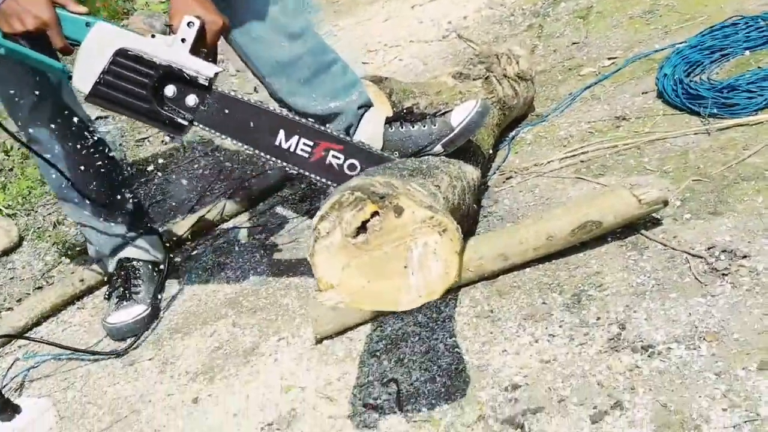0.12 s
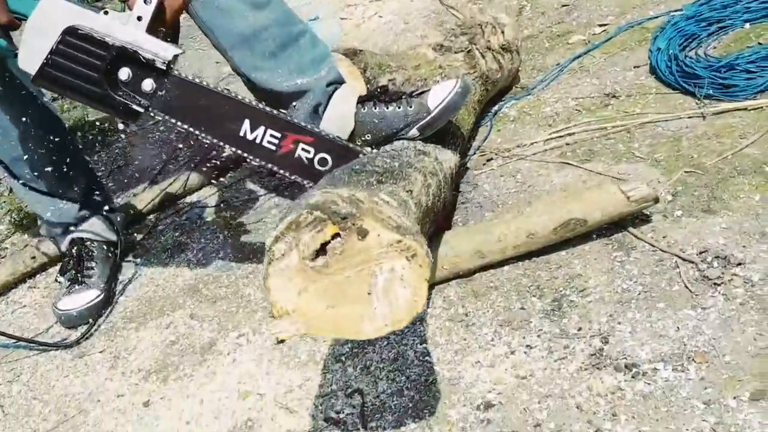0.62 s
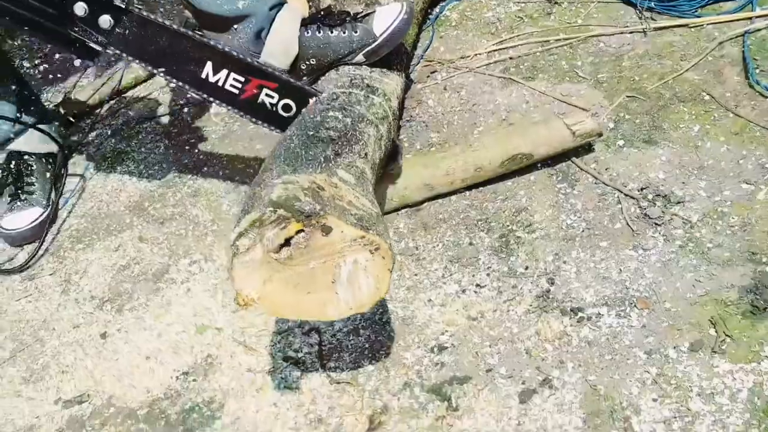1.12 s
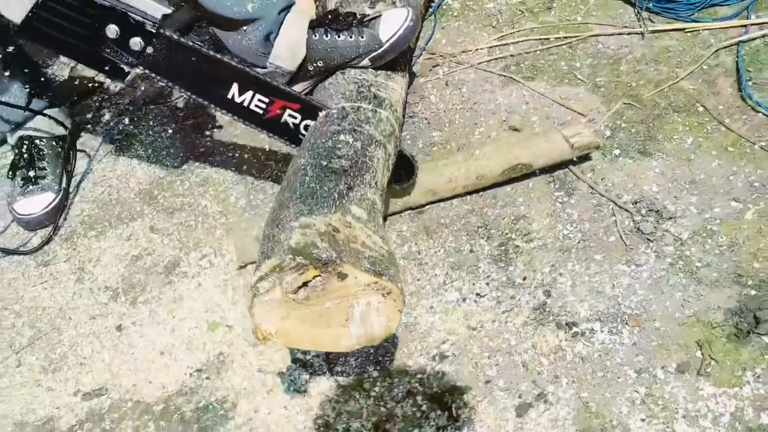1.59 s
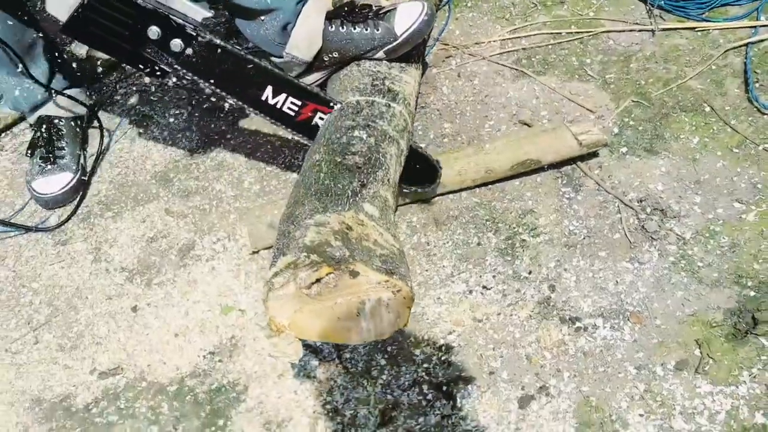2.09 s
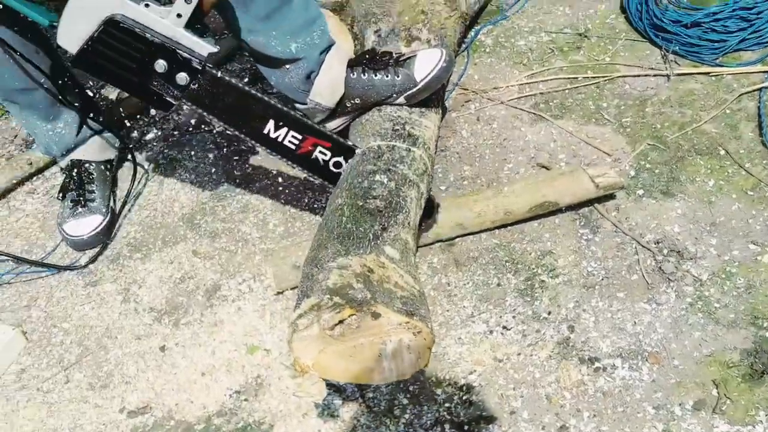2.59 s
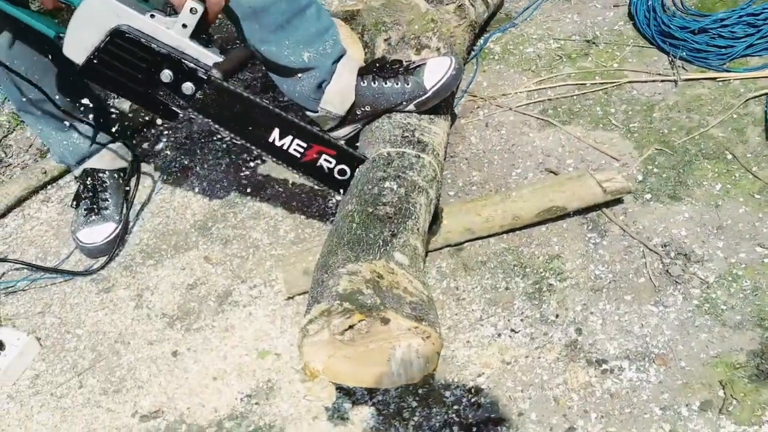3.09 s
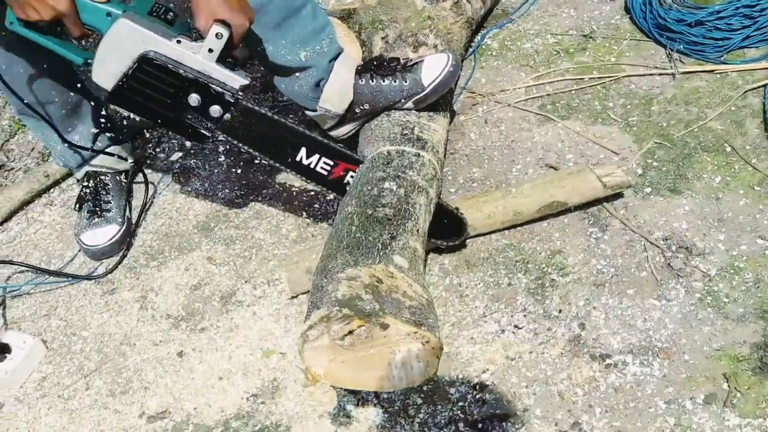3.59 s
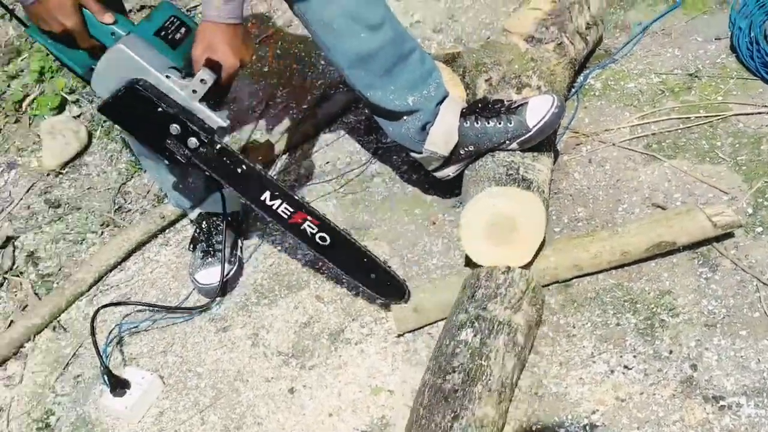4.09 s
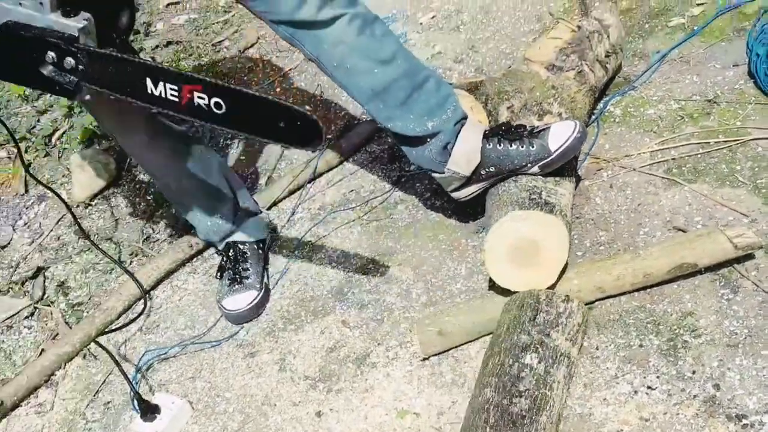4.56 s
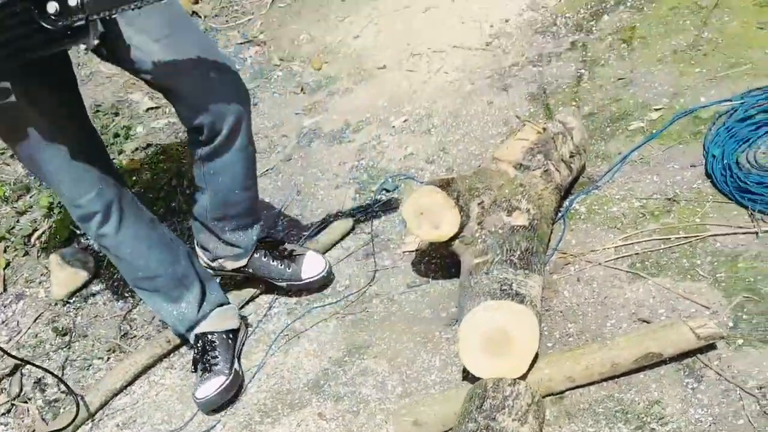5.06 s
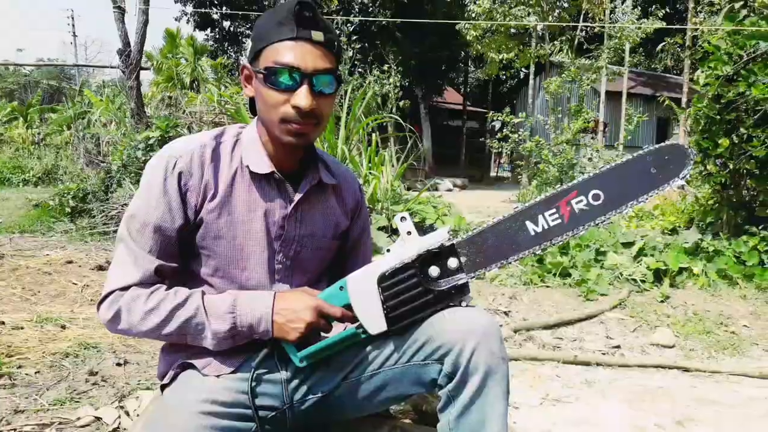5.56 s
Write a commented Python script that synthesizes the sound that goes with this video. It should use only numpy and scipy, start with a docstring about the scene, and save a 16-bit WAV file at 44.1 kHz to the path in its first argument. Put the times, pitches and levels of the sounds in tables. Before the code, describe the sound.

A close, mono outdoor take of an electric chainsaw biting through wood, loud and buzzing with slight surges and low wind on the microphone. Near four seconds it breaks through with tiny snaps and dull thumps, revs freely, then switches off and runs down, the loose chain rattling. A hard cut leads to barely audible leaves and distant soft falling tones.

```python
"""Bare ground by a garden: a corded electric chainsaw cuts through a log, runs free and coasts down.
After a short silence a quiet garden follows, with rustling leaves and faint falling tones.
Many tiny chain contacts (shaped noise) ring in bar, housing and wood; noise also makes hiss and wind.
Sine tones follow the rotor: the motor pinion whines at nine times its speed.
The chain contacts and the main gear tone throb with the sprocket."""
import sys
import numpy as np
from scipy import signal
from scipy.fft import rfft, irfft
from scipy.io import wavfile

SR = 44100
rng = np.random.default_rng(int(sys.argv[2]) if len(sys.argv) > 2 else 0)


def field_ratio(decibels):
    """Amplitude ratio for a level in dB (20 dB per decade); scalars and array-likes work."""
    return 10 ** (np.asarray(decibels, dtype=float) / 20)


def materialize(psi):
    """Save the field psi as 16-bit PCM at rate SR to the path in sys.argv[1].

    A 1-D psi becomes a single channel; in a 2-D psi each row is a channel.
    """
    bounded = np.clip(np.atleast_2d(psi).T, -1, 1)
    quanta = np.round(bounded * 32767).astype(np.int16)
    wavfile.write(sys.argv[1], SR, quanta)


N = 250488

CUT_THROUGH_S, SWITCH_OFF_S = 3.86, 4.4
SILENCE_START_S, SILENCE_END_S = 5.3905, 5.4225

# Rotor speed, unsteady under load, faster out of the wood, then coasting: t/s, speed/(turns/s)
ROTOR_SPEED = [(0.0, 366.5), (0.3, 361.6), (0.64, 368), (0.76, 363), (1.0, 368), (1.22, 366), (1.45, 369),
               (1.62, 368.6), (1.8, 373.8), (2.04, 369), (2.3, 372), (2.42, 370), (2.66, 373.6),
               (2.86, 369), (3.0, 371), (3.15, 368.4), (3.5, 372), (3.84, 377), (4.18, 400), (4.35, 385),
               (4.65, 312), (4.9, 279), (5.12, 253), (5.25, 236), (5.39, 223)]
PINION_TEETH, COMMUTATOR_BARS, GROAN_ORDER = 9, 32, 3  # each tone's multiple of the rotor speed

# Tones swell and fade as the saw rocks, one table per tone: middle t/s, length/s, level/dB
MESH_SWELLS = [(0.0, 0.086, -21), (0.342, .15, -22), (0.62, 0.5, -24.5), (1.247, 0.43, -23),
               (1.595, 0.13, -23), (1.79, 0.13, -21.5), (2.206, 0.46, -18.5), (2.494, 0.5, -17.5),
               (2.86, 0.13, -17.5), (3.05, 0.1, -18.5), (3.653, 0.26, -19.5)]
SECOND_SWELLS = [(0.04, .12, -21), (0.26, .18, -21), (0.55, .2, -24), (0.77, .14, -19), (1.12, .2, -22),
                 (1.62, .14, -19), (1.77, .12, -22), (2.05, .22, -20), (2.87, .14, -20), (3.48, .1, -26)]
UPPER_SWELLS = [(0.45, 0.18, -22), (1.35, 0.53, -24), (1.74, 0.12, -16.5), (2.15, 0.28, -27),
                (2.9, .15, -21), (3.22, 0.18, -15.5), (3.45, 0.18, -21), (3.72, 0.4, -26.5)]
LOWER_SWELLS = [(0.31, 0.13, -24), (3.54, 0.13, -22)]
HUM_SWELLS = [(0.12, 0.44, -39.5), (0.46, 0.08, -37.5), (0.65, 0.36, -42.5), (1.12, 0.23, -39),
              (1.55, 0.17, -43), (1.95, .2, -43)]
# The same for commutator whine and groan out of the wood: middle t/s, length/s, level/dB
WHINE_SWELLS = [(4.66, .12, -50), (5.17, .13, -39), (5.3, .12, -42), (5.38, .08, -35)]
GROAN_SWELLS = [(4.45, 0.46, -37), (4.75, 0.71, -36.5)]
# steady levels under the swells
MESH_DB, SECOND_DB, UPPER_DB, LOWER_DB, HUM_DB = -30.5, -35, -32, -34.5, -48.5
WHINE_DB, GROAN_DB = -55, -50.5
COAST_HUM_DB, HUM_FADE_DB_PER_S = -51.5, 6

# Force of the chain: t/s, level/dB
CHAIN_FORCE = [(0.0, -14), (0.04, -11), (2.56, -12.5), (2.62, -12.5), (3.74, -12), (3.91, -13.5),
               (4.69, -16.5), (4.75, -18.5), (5.38, -19.5)]
# Middle of each posture, as the bar sinks in and lifts out: t/s
POSTURE_TIMES = [.5, 1.5, 2.4, 3.3, 4.1, 4.42, 4.72, 5.15]
# What rings, one list per posture: f/Hz, width/Hz (held within 120 to 1200 when used), level/dB
POSTURE_RINGS = [
    [(381, 380, -19.5), (740, 340, -9), (1070, 230, 5), (1567, 110, -9), (1700, 300, 3), (2306, 1700, -3.5),
     (2980, 900, -4.5), (3215, 200, -4), (3510, 550, -0.5), (4320, 770, -3.5), (5230, 870, -4),
     (6016, 390, 1), (6320, 510, 0.5), (6910, 630, -3.5)],
    [(550, 200, -13.5), (768, 440, -12), (990, 380, -3.5), (1518, 130, 2), (1785, 330, 0),
     (2430, 530, -3.5), (3020, 1100, -7.5), (3240, 130, -1), (3564, 200, 0), (4420, 640, -7),
     (5250, 590, -10), (5740, 1400, -6), (6430, 340, -7), (6830, 320, -2)],
    [(507, 160, -23), (740, 300, -17), (977, 330, -12.5), (1594, 290, -5), (1694, 50, -17.5),
     (2420, 250, -11), (2895, 480, -13.5), (3325, 370, -6.5), (3755, 580, -8.5), (4540, 1630, -14.5),
     (5320, 220, -14), (5860, 200, -12.5), (6270, 900, -17), (6500, 790, -10.5)],
    [(548, 270, -17), (800, 340, -14.5), (917, 520, -8), (1488, 83, -2), (1684, 165, -2), (2600, 960, -7.5),
     (2900, 240, -10.5), (3440, 280, -23.5), (3490, 730, -1.5), (4760, 250, -4), (5580, 160, -3.5),
     (6450, 600, -4.5), (7190, 240, -11)],
    [(497, 172, -14), (724, 590, -8), (1050, 970, -4.5), (1512, 200, 2), (1640, 270, -2), (2380, 290, -1.5),
     (2695, 240, -1.5), (3750, 980, 2), (4760, 320, -4.5), (5460, 1400, -5.5), (6300, 1500, -12.5),
     (7200, 220, -7)],
    [(476, 160, -5), (740, 190, -10), (1080, 390, -1.5), (1670, 510, 0), (2730, 560, -0.5),
     (3760, 470, -0.5), (4770, 450, -2), (5660, 510, -4.5), (6500, 760, -3.5), (6750, 340, -9)],
    [(430, 180, -6.5), (870, 260, -4), (1250, 210, 2.5), (1590, 410, -1.5), (2630, 920, 1.5),
     (4020, 460, -1.5), (4720, 640, -3), (5780, 660, -4.5), (6500, 730, -8), (7000, 790, -11)],
    [(449, 130, 2.5), (810, 210, -13), (1117, 320, 2.5), (1654, 470, 0), (2730, 1600, -4),
     (3580, 300, -4.5), (4030, 430, 0), (4900, 630, -3.5), (5700, 810, -6.5), (6570, 270, -7),
     (6800, 340, -6)],
]
# Colour of the broad rasp between the resonances: f/Hz, level per Hz/dB
RASP_COLOUR = [(150, -24.5), (350, -6.5), (900, -9), (1250, -1.5), (1700, 3), (3300, -2.5), (5000, -8.5),
               (6800, -8), (7600, -3.5), (8400, -59), (10000, -51)]
# Colour of the fan and chip hiss: f/Hz, level per Hz/dB
HISS_COLOUR = [(6000, -25), (7600, -4.5), (8500, -10), (9500, -4.5), (10500, 0.5), (11800, 4.5), (13200, 1),
               (14300, 2), (15720, 0.5), (15800, -59)]
# hiss against the chain force, in the wood and out of it; flying chips stop within CHIPS_END_S
HISS_CUT_DB, HISS_FREE_DB, CHIPS_END_S = -12.5, -15.5, 0.049
# share by which each sprocket turn swells the ringing contacts, and its slow wavering
THROB, THROB_WAVER = 0.097, 0.079
# Bands where the ground echo cancels: f/Hz, width/Hz, share removed
GROUND_DIPS = [(570, 80, 0.36), (1225, 253, 0.69), (2178, 110, 0.42)]

# Wind on the microphone, before its flutter: t/s, level/dB
WIND_GUSTS = [(0.0, -48), (0.45, -56), (0.81, -47.5), (1.72, -54.5), (2.58, -44), (2.83, -57), (3.99, -50),
              (4.27, -58), (5.21, -51), (5.38, -64.5)]
# Colour of the wind: f/Hz, level per Hz/dB
WIND_COLOUR = [(20, -53), (35, -22), (55, -9.5), (90, -1.5), (200, -0.5), (320, -4), (500, -49)]
# Sudden low puffs: middle t/s, level/dB
WIND_PUFFS = [(0.148, -46), (0.75, -42), (0.925, -43), (1.53, -37), (2.38, -45), (2.59, -47), (3.255, -43),
              (4.405, -45), (4.71, -43), (4.96, -45.5), (5.24, -42.5), (5.33, -39)]
# Colour of the puffs: f/Hz, level per Hz/dB
PUFF_COLOUR = [(25, -29.5), (50, -8), (90, -1), (150, -3.5), (250, -14), (400, -39)]
PUFF_S = 0.036

# The cut end tears off and lands: start t/s, length/s, start f/Hz, end f/Hz, peak level/dB
OFFCUT_TONES = [(3.725, .045, 350, 320, -35), (3.78, .04, 290, 260, -37), (3.808, .045, 205, 175, -35),
                (3.937, .028, 150, 100, -36), (3.977, .03, 165, 110, -32), (4.13, .04, 160, 110, -41)]
# The last fibres snap, high and brief: t/s, level/dB
FIBRE_SNAPS = [(3.796, -16.5), (3.8266, -12.5)]
SNAP_HZ, SNAP_WIDTH_HZ, SNAP_S = 10570, 1600, 0.003
# Loud slaps of the slack chain on the bar: t/s, peak level/dB
LOUD_SLAPS = [(4.4586, -12), (4.4834, -15), (4.5084, -13), (4.595, -9.5), (4.6498, -8.5), (4.706, -8.5),
              (4.8733, -15), (4.9232, -25), (5.0018, -13), (5.053, -12), (5.0804, -9.5), (5.1098, -14.5),
              (5.1492, -11), (5.1703, -8), (5.2071, -15), (5.2125, -9), (5.2348, -13), (5.2475, -13.5),
              (5.2754, -14), (5.3093, -12), (5.3356, -12.5), (5.3472, -12)]
SMALL_SLAPS_PER_S, SMALL_SLAP_DB, SLAP_S = 20, -18, 0.0016

# Louder rustles of the leaves: middle t/s, length/s, level/dB
LEAF_RUSTLES = [(5.427, .02, -53), (5.487, 0.022, -52), (5.529, .07, -51)]
# Colour of the garden: f/Hz, level per Hz/dB
GARDEN_COLOUR = [(35, -38), (60, -8), (91, -5), (192, -8.5), (433, -22), (599, -24), (810, -28),
                 (931, -12.5), (1380, -20.5), (2310, -15), (3120, -28), (8670, -54), (15500, -29)]
# Short falling tones far off: start t/s, length/s, start f/Hz, end f/Hz, peak level/dB
FAR_FALLS = [(5.445, .06, 930, 860, -60), (5.44, .07, 465, 425, -58), (5.525, .055, 960, 900, -57),
             (5.618, .055, 1300, 960, -54), (5.512, .09, 210, 85, -43)]
GARDEN_DB, GARDEN_FADE_DB_PER_S = -52, 9


def rms_one(x):
    """Scales a signal to an average strength (rms) of 1."""
    return x / np.sqrt(np.mean(x ** 2) + 1e-20)


def in_time(rows):
    """Draws straight lines between the rows of a table, one curve per column."""
    s, *columns = np.transpose(rows)
    return [np.interp(np.arange(N) / SR, s, column) for column in columns]


def colour(x, points):
    """Multiplies the spectrum by a curve drawn over log frequency; rms 1."""
    hz, db = np.transpose(points)
    bins = np.maximum(np.arange(N // 2 + 1) * SR / N, 1)
    curve_db = np.interp(np.log(bins), np.log(hz), db)
    return rms_one(irfft(rfft(x) * field_ratio(curve_db), N))


def drift(rate_hz):
    """Slow random wandering: noise through two equal one-pole low-passes; spread 1."""
    r = np.exp(-80 * np.pi * rate_hz / SR)  # made at one value per 40 samples
    noise = rng.standard_normal(N // 40 + 2002)
    slow = signal.lfilter([1], [1, -2 * r, r * r], noise)[2000:]
    return np.interp(np.arange(N) / 40, np.arange(len(slow)), rms_one(slow))


def swelling(steady_db, swells):
    """Gain: a steady level plus bell-shaped swells, added in power."""
    t = np.arange(N) / SR
    power = field_ratio(steady_db) ** 2
    for s, length, db in swells:
        power = power + field_ratio(db) ** 2 * np.exp(-(4 * (t - s) / length) ** 2 / 2)
    return np.sqrt(power)


def resonate(x, hz, width_hz):
    """A resonance applied twice: steep flanks, dark valleys."""
    r = np.exp(-np.pi * width_hz / SR)
    b = [(1 - r * r) / 2, 0, (r * r - 1) / 2]
    a = [1, -2 * r * np.cos(2 * np.pi * hz / SR), r * r]
    return signal.lfilter(b, a, signal.lfilter(b, a, x))


def bright():
    """Noise with its bass weakened by a gentle high-pass."""
    high_pass = signal.butter(1, 2500, "high", fs=SR, output="sos")
    return signal.sosfilt(high_pass, rng.standard_normal(N))


def rotor():
    """Adds up speed into the angles of the motor shaft and of the sprocket behind the 9:53 gear."""
    angle = 2 * np.pi * np.cumsum(in_time(ROTOR_SPEED)[0]) / SR
    loaded = np.arange(N) / SR < CUT_THROUGH_S
    return angle, angle * PINION_TEETH / 53, loaded


def motor(angle, sprocket, loaded):
    """Gear teeth meet in a tone with side tones; the worn gear swells some once per sprocket turn."""
    wobble = 0.1 * drift(25)
    mesh = swelling(MESH_DB, MESH_SWELLS) * field_ratio(1.2 * drift(5.1))
    mesh *= (1 + 0.31 * np.cos(sprocket)) * np.sin(PINION_TEETH * angle + wobble)

    # twice the mesh frequency, with a neighbour one sprocket turn below and above
    phase = 2 * PINION_TEETH * angle + 0.47 * drift(18)
    second = 0.79 * np.sin(phase) + 0.63 * np.sin(phase - sprocket) + 0.34 * np.sin(phase + sprocket)
    second *= swelling(SECOND_DB, SECOND_SWELLS) * field_ratio(3.8 * drift(21))

    # side tones one rotor turn above and below the mesh
    upper = swelling(UPPER_DB, UPPER_SWELLS) * field_ratio(2.6 * drift(24))
    upper *= (0.8 + 0.2 * np.cos(sprocket)) * np.sin((PINION_TEETH + 1) * angle + 0.66 * drift(29.5))
    lower = swelling(LOWER_DB, LOWER_SWELLS) * np.sin((PINION_TEETH - 1) * angle + wobble)

    hum = swelling(HUM_DB, HUM_SWELLS) * field_ratio(2.6 * drift(12))
    hum *= np.sin(angle + 0.58 * drift(7.9))

    whine = swelling(WHINE_DB, WHINE_SWELLS) * field_ratio(drift(20)) * np.sin(COMMUTATOR_BARS * angle)
    fade_db = HUM_FADE_DB_PER_S * np.maximum(np.arange(N) / SR - CUT_THROUGH_S, 0)
    coast_hum = field_ratio(COAST_HUM_DB - fade_db) * np.sin(angle)
    groan = swelling(GROAN_DB, GROAN_SWELLS) * field_ratio(3.0 * drift(15))
    groan *= np.sin(GROAN_ORDER * angle + 0.98 * drift(23))

    in_wood = mesh + second + upper + lower + hum
    free = whine + coast_hum + groan
    return np.sqrt(2) * np.where(loaded, in_wood, free)  # sqrt(2) turns peak into rms levels


def contacts(sprocket, throb, grain_db, tooth):
    """Dense uneven contacts, bunched per turn and per tooth of the six-tooth sprocket."""
    uneven_db = grain_db * np.minimum(rng.exponential(1, N), 5)
    grains = field_ratio(uneven_db) * rng.standard_normal(N)
    turn_beat = 1 + np.clip(throb, 0, 1) * np.cos(sprocket)
    tooth_beat = 1 + tooth * np.cos(6 * sprocket)
    return rms_one(grains * turn_beat * tooth_beat)


def chain(sprocket):
    """Contacts ring in the resonances of each posture; postures blend into each other."""
    t = np.arange(N) / SR
    force_db = in_time(CHAIN_FORCE)[0]
    throb = THROB + THROB_WAVER * drift(3.3)
    slap = slaps(force_db)

    # two unrelated noise drives alternate between neighbouring resonances,
    # so they do not cancel between them; neighbouring postures use different pairs
    drives = [[slap * bright() + contacts(sprocket, throb, grain_db=1.5, tooth=0.059)
               for _ in range(2)] for _ in range(2)]
    ringing = np.zeros(N)
    for k, rings in enumerate(POSTURE_RINGS):
        share = np.interp(t, POSTURE_TIMES, np.arange(len(POSTURE_RINGS)) == k)
        near = slice(np.argmax(share > 0), N - np.argmax(share[::-1] > 0))  # where it is heard
        body = 0
        for j, (hz, width_hz, db) in enumerate(rings):
            gain = field_ratio(db + 1.25 * drift(7.1)[near])
            body = body + gain * resonate(drives[k % 2][j % 2][near], hz, np.clip(width_hz, 120, 1200))
        ringing[near] += np.sqrt(share[near]) * rms_one(body)

    rasp_contacts = contacts(sprocket, 0.12 * throb, grain_db=-2.5, tooth=0.05)
    rasp = colour(slap * bright() + rasp_contacts, RASP_COLOUR)
    hiss = colour(contacts(sprocket, 1.1 * throb, grain_db=3.0, tooth=0.11), HISS_COLOUR)
    chips_end = [CUT_THROUGH_S - CHIPS_END_S, CUT_THROUGH_S]
    hiss_db = force_db + np.interp(t, chips_end, [HISS_CUT_DB, HISS_FREE_DB]) + 0.5 * drift(11.0)
    surge = field_ratio(0.71 * drift(34))  # the teeth bite unevenly
    return surge * (field_ratio(force_db) * (ringing + field_ratio(-13.0) * rasp) + field_ratio(hiss_db) * hiss)


def ground(x):
    """The echo off the ground takes out a few narrow bands."""
    for hz, width_hz, share in GROUND_DIPS:
        b, a = signal.iirpeak(hz, hz / width_hz, fs=SR)
        x = x - share * signal.lfilter(b, a, x)
    return x


def wind():
    """Lumpy low noise with sudden puffs of their own low colour."""
    lumps = field_ratio(in_time(WIND_GUSTS)[0] + 1.8 * drift(8))
    steady = lumps * colour(rng.standard_normal(N), WIND_COLOUR)
    puff_gain = swelling(-89.5, [(s, PUFF_S, db) for s, db in WIND_PUFFS])
    return steady + puff_gain * colour(rng.standard_normal(N), PUFF_COLOUR)


def falling(tones):
    """Soft, slightly ragged tones that fall quickly in pitch and then level out."""
    out = np.zeros(N)
    for s, length, start_hz, end_hz, db in tones:
        u = np.arange(round(length * SR)) / (length * SR)  # 0 to 1 along the tone
        hz = end_hz + (start_hz - end_hz) * np.exp(-3.5 * u)
        swell = field_ratio(db) * np.sin(np.pi * u ** 0.8)
        tone = swell * np.sin(2 * np.pi * np.cumsum(hz) / SR)
        i = round(s * SR)
        out[i:i + len(u)] += tone[:N - i]
    return out * field_ratio(2 * drift(30))


def snaps():
    """Breaking fibres: noise around one high resonance, starting at once and dying away quickly."""
    t = np.arange(N) / SR
    bursts = np.zeros(N)
    for s, db in FIBRE_SNAPS:
        bursts += field_ratio(db) * np.exp(-np.maximum(t - s, 0) / SNAP_S) * (t >= s)
    return bursts * rms_one(resonate(rng.standard_normal(N), SNAP_HZ, SNAP_WIDTH_HZ))


def slaps(force_db):
    """Each slap of the slowing chain lifts the contact force for milliseconds; small ones are random."""
    small = (rng.random(N) < SMALL_SLAPS_PER_S / SR) * (np.arange(N) / SR > SWITCH_OFF_S)
    kicks = small * field_ratio(SMALL_SLAP_DB + 2.5 * rng.standard_normal(N))
    for s, db in LOUD_SLAPS:
        kicks[round(s * SR)] = field_ratio(db)
    r = np.exp(-1 / (SLAP_S * SR))
    # each kick rises to its own level after SLAP_S, then dies away
    pulses = signal.lfilter([np.e * (1 - r)], [1, -2 * r, r * r], kicks + 1e-18)
    return pulses / field_ratio(force_db)  # chain() multiplies by the force again


def garden():
    """Leaves rustle as coloured noise under a few faint falling tones."""
    since_silence = np.maximum(np.arange(N) / SR - SILENCE_END_S, 0)
    fading_db = GARDEN_DB - GARDEN_FADE_DB_PER_S * since_silence
    gain = swelling(fading_db, LEAF_RUSTLES) * field_ratio(1.5 * drift(35))
    return gain * colour(rng.standard_normal(N), GARDEN_COLOUR) + falling(FAR_FALLS)


def scene():
    """Adds up the saw and the wind, stops them for the silence, then fades the garden in over 3 ms."""
    angle, sprocket, loaded = rotor()
    t = np.arange(N) / SR
    saw = motor(angle, sprocket, loaded) + ground(chain(sprocket))
    saw = saw + falling(OFFCUT_TONES) + snaps() + wind()
    garden_fade = np.clip((t - SILENCE_END_S) / 0.003, 0, 1)
    mono = saw * (t < SILENCE_START_S) + garden() * garden_fade
    return np.array([mono, mono])


def low_pass(x):
    """Removes everything above the highest recorded frequency."""
    return signal.sosfilt(signal.butter(12, 15790, fs=SR, output="sos"), x)


def record(dry):
    """One microphone without deep bass; the highest peaks are rounded."""
    high_pass = signal.butter(2, 45, "high", fs=SR, output="sos")
    port = signal.sosfilt(high_pass, dry)
    rounded = 1.727 * np.tanh(port / 1.826)
    return low_pass(rounded)


dry = scene()
out = record(dry)
materialize(out)
```